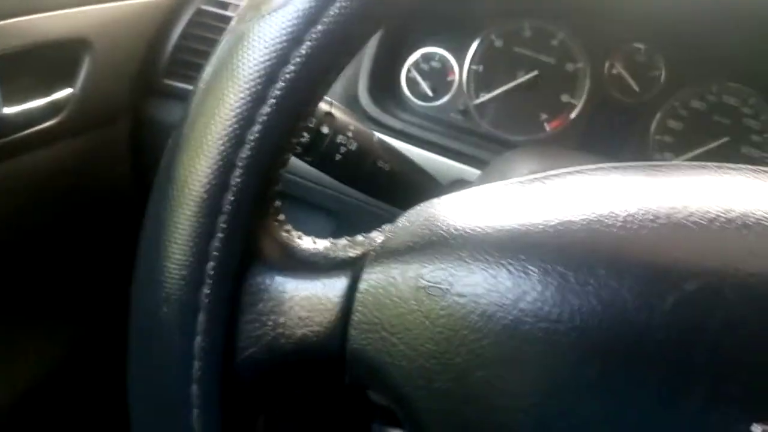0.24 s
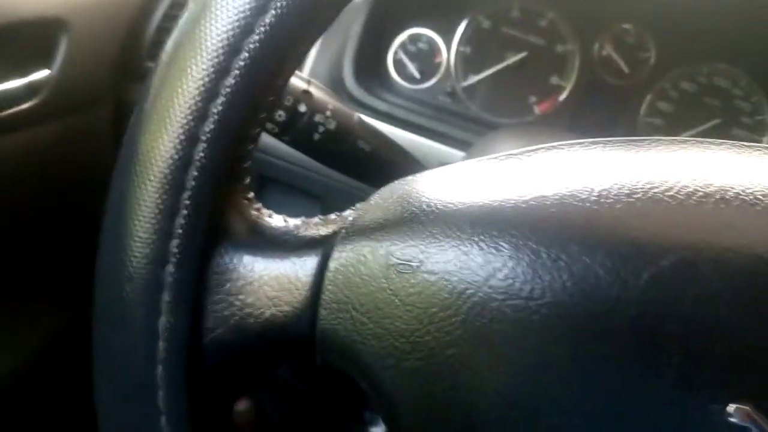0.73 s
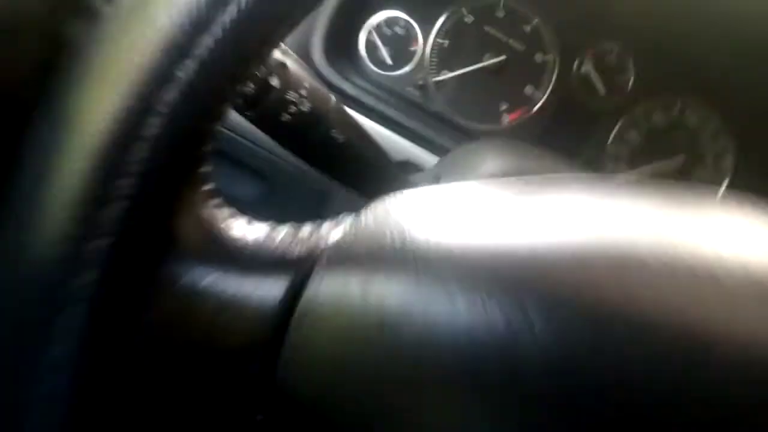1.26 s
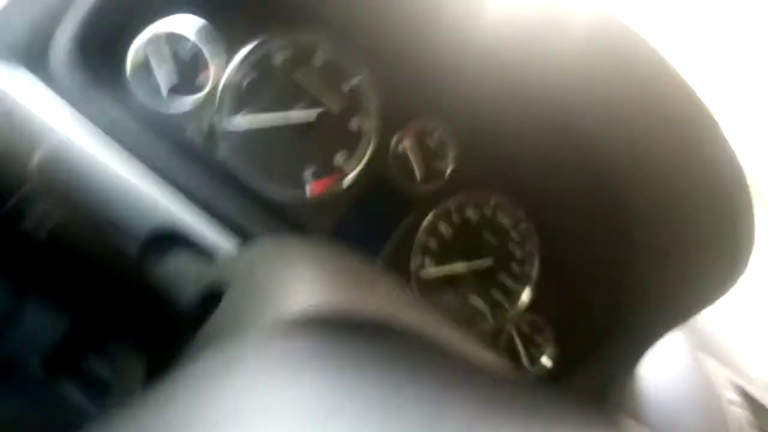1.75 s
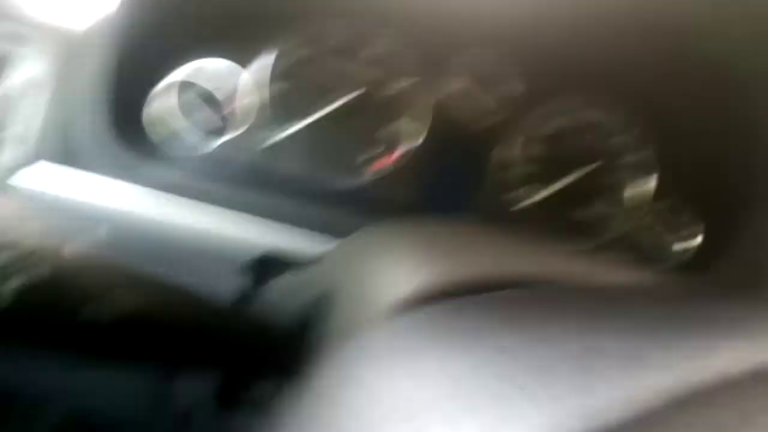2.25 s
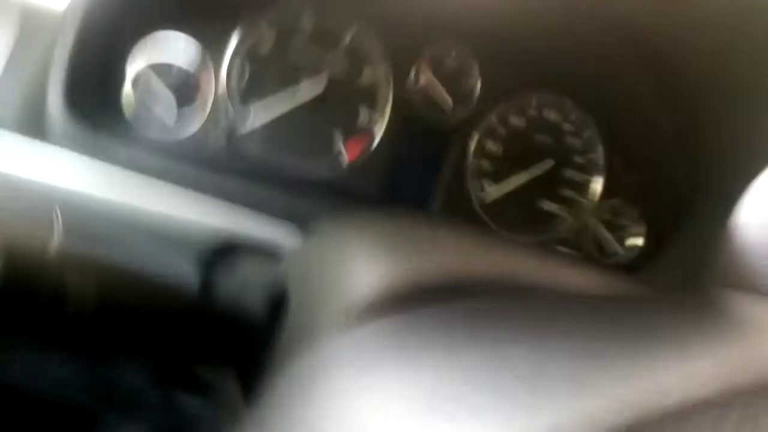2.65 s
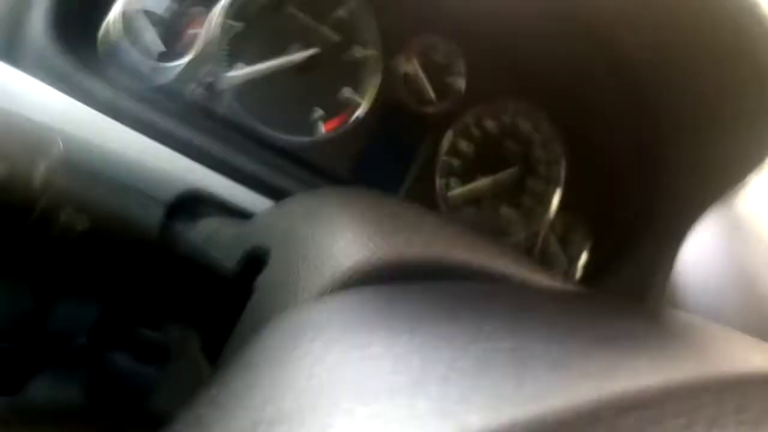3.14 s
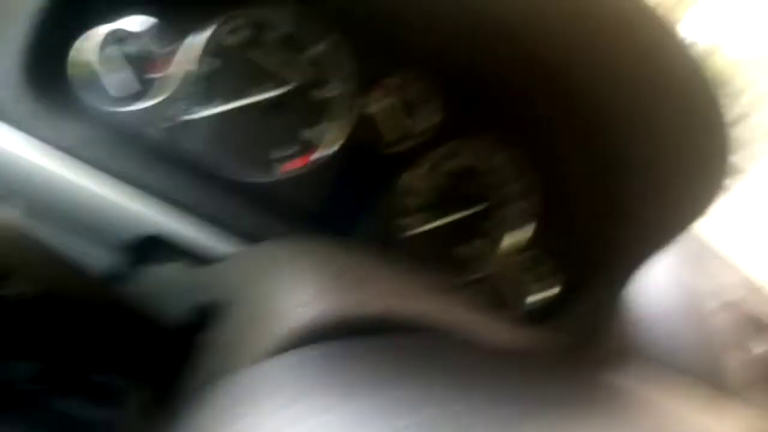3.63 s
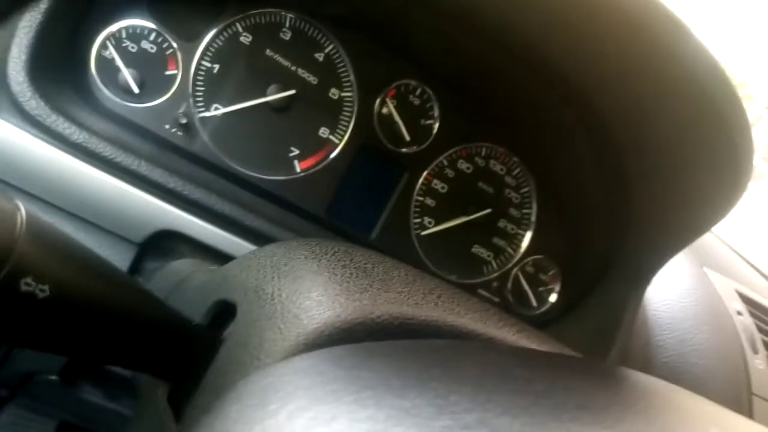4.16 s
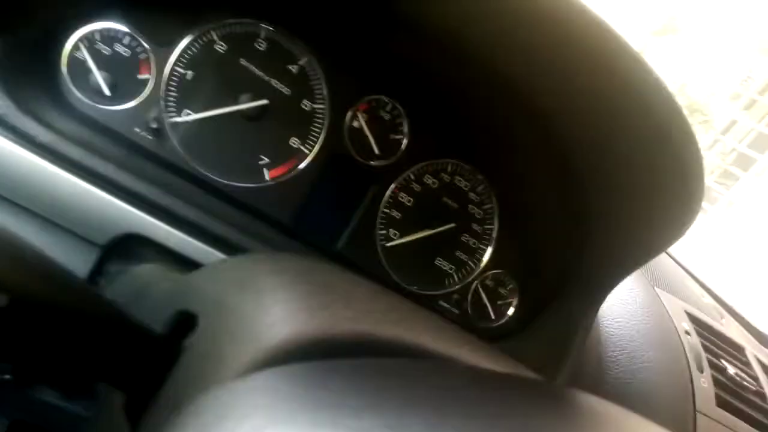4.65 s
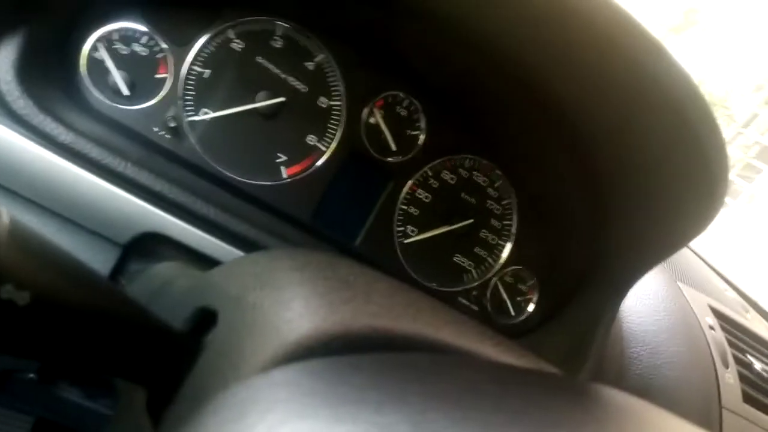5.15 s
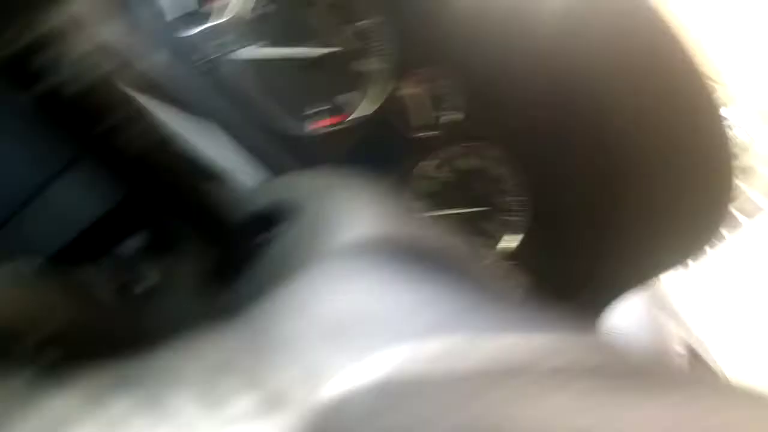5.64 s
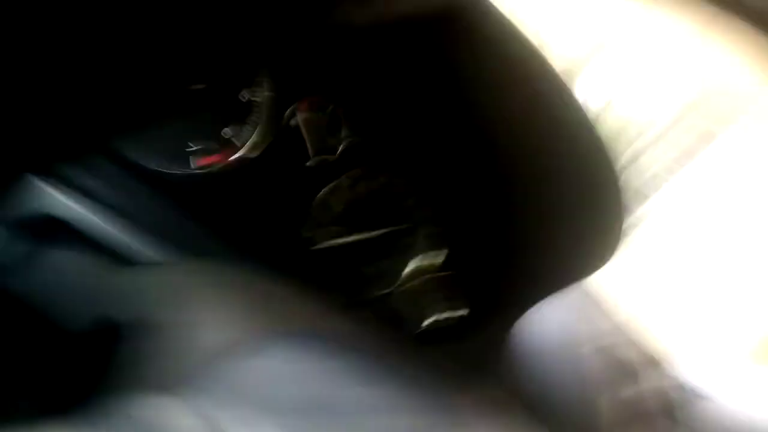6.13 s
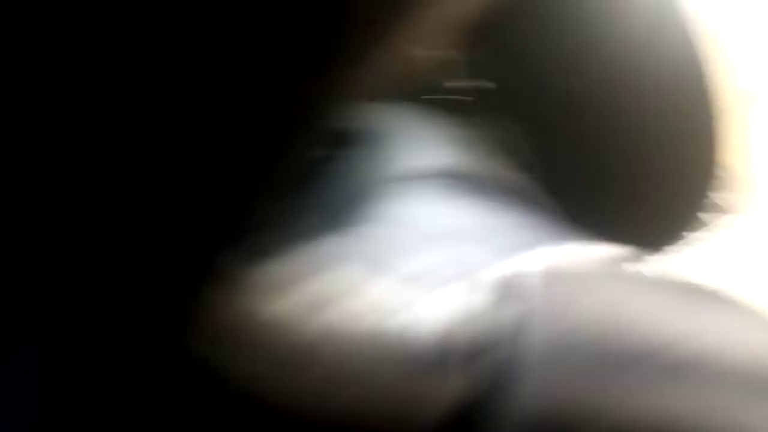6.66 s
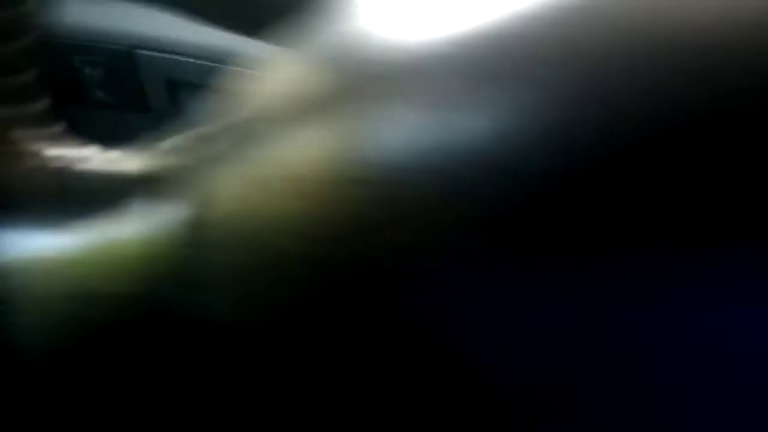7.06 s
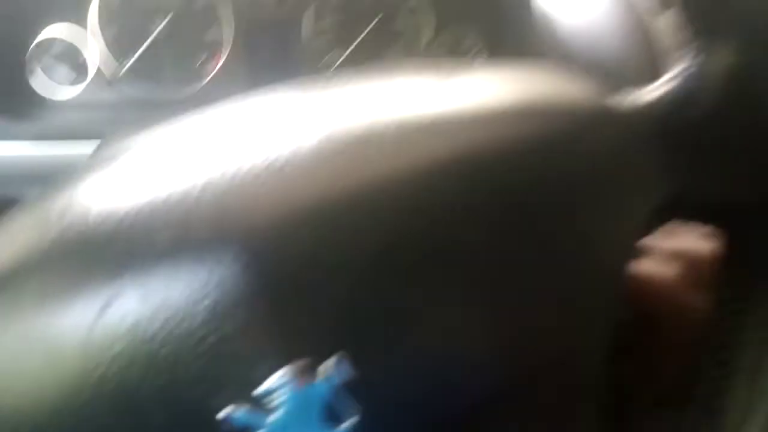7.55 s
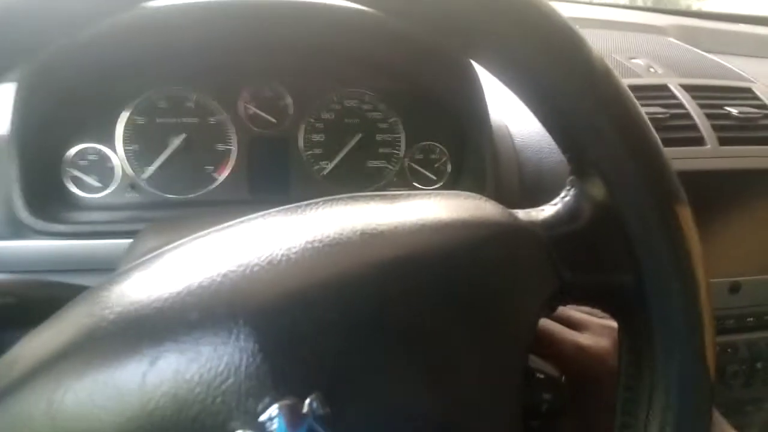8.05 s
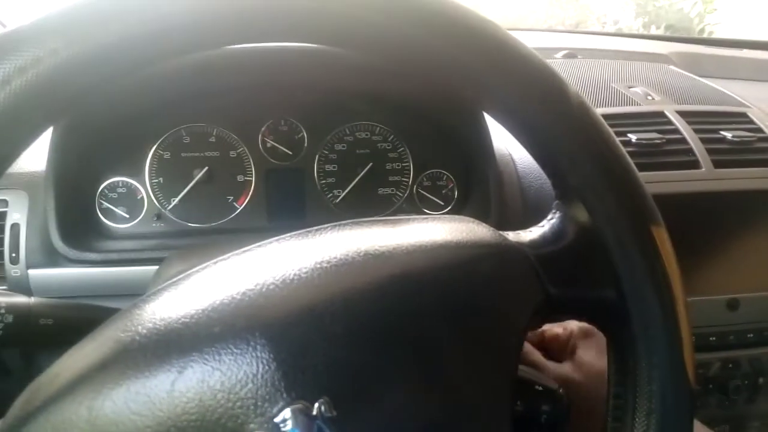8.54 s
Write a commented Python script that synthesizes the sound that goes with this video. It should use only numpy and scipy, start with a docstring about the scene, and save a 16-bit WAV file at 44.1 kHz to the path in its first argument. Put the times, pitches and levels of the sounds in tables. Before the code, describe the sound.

A hand works a key and wrenches a locked steering wheel in a small, dry, padded cabin. Quiet ticks and sleeve rubbing lead to rapid rattling clacks with booming column thuds and dull plastic taps. Smaller clicks follow, then another heavy knock with creaking trim, a still pause, and crisp metallic clicks with a very faint ring. Low handling rumble and light microphone hiss sit underneath.

```python
"""A metallic clack opens over faint hiss and low rumble, in a parked car where a hand works a key in the
ignition lock and jerks the steering wheel against its lock. Metal and plastic clacks are noise bursts
through the lock's modes; thuds, taps and ringing metal are decaying sines, with panel noise under the thuds.
Sleeve and hand rustle and creak as mottled noise, over rumble and cabin boom; the microphone adds hiss."""
import sys
import numpy as np
from scipy import signal
from scipy.fft import rfft, irfft, next_fast_len
from scipy.io import wavfile
from scipy.ndimage import uniform_filter1d, map_coordinates

SR = 44100
rng = np.random.default_rng(int(sys.argv[2]) if len(sys.argv) > 2 else 0)


def master_out(mix):
    """Clip the mix to full scale and print it as 16-bit PCM to the path in sys.argv[1]."""
    frames = np.transpose(np.atleast_2d(mix))
    ceiling = np.clip(frames, -1, 1)
    pcm = np.round(ceiling * 32767).astype(np.int16)
    wavfile.write(sys.argv[1], SR, pcm)


N = 387638

# The body on the seat. Each row: time in seconds, rumble level in dB, boom level in dB.
SHIFTING = [(0.0, -68, -60.5), (0.81, -74, -67.5), (1.35, -60, -53), (1.93, -66, -70), (2.1, -47.5, -51),
            (2.37, -37, -47), (2.69, -52, -59), (3.06, -47, -43.5), (3.21, -49.5, -58.5),
            (3.42, -50.5, -47.5), (3.7, -68.5, -74.5), (5.75, -66, -73), (5.97, -48, -47.5),
            (6.17, -51.5, -60.5), (6.44, -51, -50.5), (6.93, -66.5, -69), (7.83, -70.5, -75.5),
            (8.79, -64.5, -67.5)]
# Strokes of hand and sleeve over wheel and trim.
# Each row: start in seconds, length in seconds, rustle level in dB, creak level in dB.
STROKES = [(0.415, 0.11, -77.5, -79), (0.911, 0.25, -61.5, -67.5), (1.2, 0.28, -59, -72.5),
           (1.485, 0.16, -71, -82), (1.616, 0.14, -58.5, -80), (1.81, 0.18, -59.5, -76),
           (2.033, 0.25, -63, -77), (2.273, 0.071, -72, -76), (2.403, 0.21, -68, -72.5),
           (3.016, 0.062, -73, -62), (3.148, 0.1, -66.5, -57.5), (3.302, 0.22, -65.5, -70),
           (3.717, 0.21, -73, -84.5), (4.078, 0.13, -83, -72.5), (4.491, 0.12, -77, -92),
           (5.234, 0.34, -76, -94), (5.726, 0.29, -66, -76), (5.961, 0.31, -67, -63),
           (6.176, 0.064, -65, -70), (6.301, 0.11, -61, -60), (6.435, 0.12, -64.5, -65),
           (6.661, 0.15, -92, -79), (6.878, 0.068, -81.5, -80), (7.154, 0.2, -89.5, -79),
           (7.86, 0.072, -84, -77.5), (8.074, 0.29, -65.5, -71), (8.488, 0.18, -85, -74)]
# Clacks of key, lock and trim. Each row: start in seconds, relative level in dB, strongest ring in Hz,
# relative low-body level in dB, relative edge (top treble) level in dB, decay t60 in seconds.
CLACKS = [(0.0074, -26.5, 3060, -2.5, -64, 0.066), (0.6275, -39, 4900, -9, -47.5, 0.066),
          (0.648, -45.5, 2920, -7, -48, 0.056), (0.928, -41.5, 2860, -17, -50, 0.11),
          (0.9502, -37, 4800, -6.5, -51.5, 0.065), (1.0091, -39, 4730, -17, -46, 0.13),
          (1.1957, -23, 5540, -9, -28, 0.084), (1.2371, -31, 4160, -8, -48.5, 0.15),
          (1.2511, -27.5, 4070, -18, -54.5, 0.137), (1.3508, -37, 5460, -9.5, -32, 0.1),
          (1.39, -38, 5050, -12.5, -53, 0.06), (1.6591, -41, 3200, -0.5, -43, 0.17),
          (1.917, -35.5, 4850, -7, -50.5, 0.11), (1.942, -37, 4800, 2, -51, 0.12),
          (1.9859, -9, 5150, -4.5, -34, 0.092), (2.0092, -29.5, 5000, 12, -36.5, 0.05),
          (2.0462, -28.5, 4200, -17, -43.5, 0.049), (2.1141, -30, 2950, -2.5, -51, 0.048),
          (2.1725, -23, 4410, 4, -40.5, 0.089), (2.2413, -28.5, 5600, -14, -41, 0.042),
          (2.318, -42, 4500, 10, -47, 0.09), (2.3526, -7, 4950, -4, -35.5, 0.1),
          (2.3994, -31.5, 1860, 0, -45, 0.035), (2.446, -43, 4240, -27, -48, 0.05),
          (2.4897, -31, 3100, -1.5, -47, 0.075), (2.5272, -21.5, 2880, 6, -30, 0.12),
          (2.5587, -27, 1710, -36, -40, 0.12), (2.6095, -31, 4400, -29.5, -37, 0.067),
          (2.7556, -30, 5026, 1, -38, 0.11), (2.7955, -8.5, 4820, -6, -34.5, 0.058),
          (2.8194, -23, 4940, 1.5, -37.5, 0.092), (2.8594, -37.5, 1830, -37, -47.5, 0.07),
          (2.9387, -37.5, 2530, -8, -41.5, 0.12), (2.9876, -14.5, 3670, 2, -40.5, 0.11),
          (3.0106, -20, 3190, -3.5, -33.5, 0.11), (3.0472, -32.5, 4670, -16, -33.5, 0.17),
          (3.068, -28.5, 5000, -7, -33.5, 0.14), (3.095, -33, 4800, -10, -35.5, 0.066),
          (3.2555, -10, 4700, -6.5, -33, 0.083), (3.3268, -30, 6330, -8, -43.5, 0.056),
          (3.358, -37.5, 4420, 6, -46, 0.061), (3.4156, -19.5, 3700, 0, -36.5, 0.067),
          (3.4444, -37.5, 3546, -20, -30.5, 0.19), (3.489, -36.5, 5180, 3, -45, 0.146),
          (3.756, -54, 2100, -27, -48, 0.11), (3.7948, -37.5, 4740, -30.5, -28.5, 0.065),
          (3.8432, -39.5, 4380, -20, -42, 0.095), (3.8751, -39, 4900, -15, -48, 0.077),
          (3.9165, -29, 2930, 0.5, -39.5, 0.066), (4.1006, -49, 4760, 4, -35, 0.099),
          (4.1285, -41, 2930, -3.5, -40, 0.059), (4.195, -58, 3880, -9, -48, 0.078),
          (4.265, -53, 2940, 0.5, -47.5, 0.18), (4.4912, -43, 5570, -33, -22.5, 0.12),
          (4.5386, -57.5, 5340, -16, -6, 0.062), (4.5511, -50, 1920, -4, -36, 0.12),
          (4.5855, -43.5, 3900, -11, -40.5, 0.36), (4.6089, -35.5, 2880, -4, -40.5, 0.15),
          (4.6558, -22, 5790, -10.5, -29.5, 0.063), (4.748, -57.5, 4930, -21, -40, 0.14),
          (4.8344, -35.5, 4600, -17, -47, 0.095), (4.9197, -21, 4620, -12, -43.5, 0.086),
          (4.9444, -28.5, 4660, -24, -30.5, 0.092), (4.968, -30.5, 4900, -3.5, -29.5, 0.076),
          (4.981, -31, 2960, -9, -36.5, 0.061), (5.3657, -41, 4540, -6.5, -45.5, 0.11),
          (5.436, -53, 4160, -33, -32.5, 0.077), (5.6521, -34, 5080, -21.5, -32.5, 0.071),
          (5.754, -37.5, 5070, -45, -37.5, 0.14), (5.7867, -39, 5500, -33, -35.5, 0.061),
          (5.823, -29.5, 5100, -17, -43.5, 0.061), (5.8391, -33.5, 4500, -1, -43, 0.16),
          (5.874, -44, 5200, -12, -44, 0.056), (5.9364, -6.5, 4570, -8, -31.5, 0.063),
          (6.1275, -39, 4650, -6, -43, 0.095), (6.1848, -23, 5360, -58, -26, 0.021),
          (6.1964, -32.5, 4650, -19, -27, 0.035), (6.219, -46, 3670, -3, -37, 0.17),
          (6.4652, -26.5, 4080, -11, -47, 0.07), (6.5201, -51, 4570, -9, -23.5, 0.12),
          (6.536, -40.5, 5490, -13, -38, 0.07), (6.738, -63.5, 1550, -6, -55, 0.11),
          (8.108, -29, 3090, -3.5, -49, 0.15), (8.1594, -18.5, 6000, -15, -24.5, 0.066),
          (8.186, -36.5, 5360, -12, -33.5, 0.14), (8.265, -41, 5800, -14, -42, 0.09),
          (8.307, -28, 6100, -8, -43, 0.072), (8.3195, -26.5, 4600, -9, -41.5, 0.098),
          (8.402, -50, 4350, -30, -48.5, 0.1), (8.4896, -26.5, 6280, -8.5, -24, 0.12),
          (8.5356, -42.5, 2870, -5.5, -32, 0.066), (8.6906, -31.5, 5670, -5.5, -27.5, 0.07)]
# Weak scrapes as the play is taken up before a clack. Each row: start in seconds, relative level in dB.
LEAD_INS = [(2.164, -27.5), (2.345, -20.5), (2.52, -19.5), (2.748, -33), (2.981, -19.5), (3.243, -22.5),
            (3.405, -30), (3.907, -48), (4.646, -33.5), (4.904, -39), (5.925, -25.5), (8.102, -38)]
# Thuds through column and dash. Each row: start in seconds, column level in dB, column ring in Hz,
# panel level in dB relative to the column.
THUDS = [(0.07, -48.5, 118, -21.5), (0.469, -48.5, 137.5, -24), (0.691, -43, 124, -31),
         (0.952, -42, 177.5, -18), (1.208, -42.5, 141, -15), (1.351, -41.5, 102, -34),
         (1.424, -47.5, 119, -20), (1.656, -37, 103, -16), (1.976, -26.5, 179, -13),
         (1.982, -26, 95.3, -3.5), (2.18, -26.5, 184.3, -11), (2.233, -47, 170, -4), (2.364, -16, 153, -13),
         (2.396, -29.5, 117.3, -16), (2.536, -29.5, 200.7, -15), (2.549, -22.5, 110.5, -14.5),
         (2.722, -41, 113, -26), (2.81, -22.5, 139, -12.5), (2.852, -46, 99, -24), (2.995, -30.5, 191, -4),
         (3.001, -20, 132.4, -13), (3.245, -39, 182, 6.5), (3.269, -29, 163.4, -10),
         (3.425, -30, 123.7, -16.5), (3.492, -32, 116.7, -18.5), (3.892, -39.5, 138.3, -20),
         (4.135, -48.5, 174, -22), (4.268, -48, 139.6, -31), (4.541, -44, 125.5, -42),
         (4.66, -41, 139, -32), (4.92, -43, 175, -17), (4.944, -35.5, 175.2, -25),
         (5.375, -41.5, 118.4, -35), (5.889, -28, 149, -11.5), (5.935, -25, 100, -4.5),
         (5.952, -29, 122, -21), (6.062, -47, 113, -17), (6.165, -33, 122.7, -40), (6.278, -53, 93.4, -5),
         (6.403, -33, 265.4, -0.5), (6.413, -24.5, 104.4, -12), (6.517, -37.5, 126.6, -27),
         (6.654, -52, 113.5, -24.5), (8.119, -44, 136, -28), (8.173, -38.5, 127.6, -36),
         (8.348, -44.5, 125.5, -14), (8.583, -32.5, 131.2, -11), (8.622, -36.5, 168, -7.5),
         (8.707, -43.5, 72, -8)]
# Dull taps on plastic. Each row: start in seconds, relative level in dB, ring in Hz, decay t60 in seconds.
TAPS = [(1.419, -35.5, 757, 0.03), (1.964, -35.5, 770, 0.073), (2.173, -24, 716, 0.024),
        (2.231, -34.5, 597, 0.051), (2.312, -37, 770, 0.019), (2.367, -13.5, 604, 0.03),
        (2.553, -23, 496, 0.029), (2.818, -28.5, 430, 0.1), (2.939, -39.5, 1090, 0.029),
        (3.016, -16.5, 572, 0.029), (3.437, -32, 470, 0.018), (3.464, -33.5, 760, 0.024),
        (3.487, -35, 750, 0.032), (3.514, -39, 795, 0.023), (3.544, -39, 796, 0.027),
        (4.125, -44.5, 1150, 0.029), (5.825, -27, 650, 0.029), (6.024, -34.5, 945, 0.017),
        (6.063, -29.5, 940, 0.015), (6.127, -39, 1020, 0.046), (6.153, -37, 896, 0.016),
        (6.174, -25, 840, 0.0045), (6.406, -31.5, 737, 0.046), (6.74, -60.5, 603, 0.2),
        (8.245, -45.5, 513, 0.08), (8.495, -34, 1112, 0.048), (8.691, -41, 1565, 0.082)]
# Modes of a loose metal part. Each row: frequency in Hz, decay t60 in seconds.
RING_MODES = [(1340, 1.2), (3912, 1.2)]
# Blows on that part. Each row: start in seconds, level of the first mode in dB, level of the second in dB.
RING_BLOWS = [(8.492, -76, -70), (8.692, -59, -73)]
# Modes of lock and trim. Each row: frequency in Hz, strength in dB.
LOCK_MODES = [(570, -7.5), (750, -3.5), (900, -4), (1110, -4.5), (1420, -9), (2060, -3.5), (2350, -10),
              (2930, -2), (3430, -5.5), (3650, -1.5), (4100, 1), (4370, -4.5), (4880, -3), (5250, 2),
              (5650, 1.5), (6100, -3)]

# Noise colours. Each row: frequency in Hz, relative density in dB per Hz.
RUSTLE_COLOUR = [(500, -28), (1200, -7.5), (1900, -3), (3350, -2.5), (4750, 1.5), (6500, -9), (8000, -35.5),
                 (13000, -100)]
RUMBLE_COLOUR = [(50, -35), (85, -0.5), (119, 2), (188, -4), (247, -20), (300, -16.5), (390, -56.5),
                 (660, -120)]
CREAK_COLOUR = [(180, -34.5), (300, -7), (600, -2), (1200, -7.5), (2500, -20.5), (6000, -100)]
# lowest cabin mode
BOOM_COLOUR = [(22, -37.5), (40, -12), (62, 8.5), (80, -2), (250, -110)]
CLACK_COLOUR = [(180, -21), (300, -10.5), (595, -9), (1120, -4.5), (1240, -8), (1440, -3), (2340, -4.5),
                (2730, -1.5), (3120, -8), (4970, -5), (6720, -11), (7940, -30)]
# brightest part of a clack
EDGE_COLOUR = [(7000, -72.5), (8500, -39.5), (11000, -43.5), (13300, -46.5), (15000, -33), (16300, -41)]
# dash panel under a thud
PANEL_COLOUR = [(200, -27), (270, 1), (450, -1), (650, -18.5), (2500, -120)]
HISS_COLOUR = [(120, -32.5), (200, 0), (323, -2.5), (374, -4), (857, -13), (1890, -12.5), (4930, -20),
               (6260, -19.5), (8560, -30.5), (13600, -29), (15100, -21.5), (16300, -34)]

# The low body is weak in a clack's first blow and grows in the rattle.
# Each row: frequency in Hz, relative gain in dB.
BODY_LAG = [(1600, -6), (2600, -1.5)]
# Part of a clack that misses the modes, so light contacts ring clearer than hard ones.
# One row: light contact in dB, its share as a gain, hard contact in dB, its share as a gain.
PLAIN_SHARE = [-45, .3, -20, 1.1]

SPAN = SR // 2  # samples in half a second
REST_RUSTLE_DB, REST_CREAK_DB = -85, -84.5  # between strokes
STROKE_ATTACK_S, STROKE_T60 = 0.07, 0.17  # seconds
GRIT_PER_S, GRIT_DB, GRIT_SPREAD_DB, GRIT_T60 = 140, -6, 1.5, 0.015  # ticks riding on the rustle; t60 in s
SING_DB, SING_WIDTH_HZ, SING_WANDER_DB = 3, 60, 5.5  # trim modes under rubbing
SHUDDER_DB, SHUDDER_T60, SHUDDER_RISE_S = -5.5, 0.23, 0.014  # rumble after a thud; t60 in s
FOCUS_DB, FOCUS_WIDTH = 5, .5  # lift around a clack's ring, and its width in log frequency
HALF_WIDTH_HZ = 45  # of each lock mode
STRIKE_S = .0004  # shortest possible rise of a clack, in seconds
CHATTER_DB, HILLS_DB = 1.5, 3.5  # stutter of a tail, random colour of each contact
HANDOVER = .12  # share of t60 after which neighbouring parts take over the rattle
STRIKE_FOCUS = 1.4  # focus factor of the first blow
SAG, SAG_S = 0.32, .012  # a thud starts this share sharp and settles with this time constant in seconds
COLUMN_T60, COLUMN_RISE_S = 0.2, 0.015  # seconds
HISS_DB, TOP_HZ = -76, 16000


def amp(db):
    """Gain of a level in dB."""
    return 10 ** (np.asarray(db) / 20)


def unit(x):
    """Signal scaled to rms 1."""
    return x / np.sqrt(np.mean(x ** 2) + 1e-20)


def along(points, hz):
    """Curve through (Hz, value) points on a log frequency axis."""
    f, v = np.transpose(points)
    return np.interp(np.log(hz + 1), np.log(f + 1), v)


def filtered(x, gain):
    """Signal shaped by a gain over frequency."""
    m = next_fast_len(len(x) + 4096)
    return irfft(rfft(x, m) * gain(np.fft.rfftfreq(m, 1 / SR)), m)[:len(x)]


def coloured(x, colour):
    """Signal given a colour in dB over frequency, at rms 1."""
    return unit(filtered(x, lambda f: amp(along(colour, f))))


def wobble(rate, size=N):
    """Smooth random curve with this many knots a second."""
    knots = rng.standard_normal(int(size * rate / SR) + 4)
    return map_coordinates(knots, [np.arange(size) * rate / SR])


def add(track, s, sound):
    """Mixes a sound into the track at s seconds."""
    track[max(round(s * SR), 0):][:len(sound)] += sound


def damped(hz, t60, rise, sag=0):
    """One decaying mode with a soft start; its pitch may start sharp and sag."""
    t = np.arange(SPAN) / SR
    bent_time = t + sag * SAG_S * (1 - np.exp(-t / SAG_S))
    return np.sin(2 * np.pi * hz * bent_time) * amp(-60 * t / t60) * (1 - np.exp(-t / rise))


def mottled(colour, patchy_db, lumps_db):
    """Coloured noise of rms 1 with patches of random gain in time and frequency."""
    z = signal.stft(rng.standard_normal(N + 512), nperseg=512)[2]
    field = uniform_filter1d(rng.standard_normal(z.shape), size=3, axis=0)
    field = uniform_filter1d(field, size=7, axis=1)
    noise = signal.istft(z * amp(patchy_db * unit(field)), nperseg=512)[1][:N]
    return coloured(noise * amp(lumps_db), colour)


def movement():
    """The body shifts: rubbing, plus seat and dash rumble and a cabin boom, each as uneven noise."""
    seconds, rumble_db, boom_db = np.transpose(SHIFTING)
    now = np.arange(N) / SR
    rumble_gain = amp(np.interp(now, seconds, rumble_db)) + shudder()
    boom_gain = amp(np.interp(now, seconds, boom_db))
    rumble = mottled(RUMBLE_COLOUR, patchy_db=4.0, lumps_db=0.41 * wobble(5.2))
    boom = mottled(BOOM_COLOUR, patchy_db=.8, lumps_db=3 * wobble(7))
    return rubbing() + rumble_gain * rumble + boom_gain * boom


def shudder():
    """Gain of the dash rumble that every thud sets off and that then dies away."""
    out, t = np.zeros(N + SR), np.arange(SPAN) / SR
    for s, db, *_ in THUDS:
        add(out, s, amp(db + SHUDDER_DB - 60 * t / SHUDDER_T60) * (1 - np.exp(-t / SHUDDER_RISE_S)))
    return out[:N]


def rubbing():
    """Cloth rubs in mottled grains with gritty catches, and the trim creaks in lumps."""
    rustle_gain, creak_gain = strokes()
    rustle = mottled(RUSTLE_COLOUR, patchy_db=3, lumps_db=1.2 * wobble(15) + 1.5 * wobble(200))
    creak = mottled(CREAK_COLOUR, patchy_db=3, lumps_db=3 * wobble(60) + 2 * wobble(12))
    gritty = rustle + amp(GRIT_DB) * grit()
    return rustle_gain * through_trim(gritty) + creak_gain * through_trim(creak)


def strokes():
    """Gains of rustle and creak: every stroke rises, holds and dies away."""
    gains = amp([[REST_RUSTLE_DB], [REST_CREAK_DB]]) * np.ones(N + SR)
    t = np.arange(SR) / SR
    for s, length, *levels in STROKES:
        press = np.minimum(t / STROKE_ATTACK_S, 1) * amp(-60 * np.maximum(t - length, 0) / STROKE_T60)
        for gain, db in zip(gains, levels):
            add(gain, s, amp(db) * press)
    return gains[:, :N]


def grit():
    """Sparse short noise ticks of uneven size where hand and sleeve catch."""
    catches = (rng.random(N) < GRIT_PER_S / SR) * amp(GRIT_SPREAD_DB * rng.exponential(size=N))
    envelope = signal.lfilter([1], [1, -amp(-60 / (SR * GRIT_T60))], catches)
    return coloured(envelope * rng.standard_normal(N), RUSTLE_COLOUR)


def through_trim(x):
    """Rubbing makes the lock and trim modes sing faintly, now one, now another."""
    f, t, z = signal.stft(x, SR, nperseg=1024)
    gain = 1
    for hz, db in LOCK_MODES:
        wander_db = SING_WANDER_DB * wobble(12 * 512, size=len(t))  # twelve knots a second, frames 512 apart
        gain = gain + amp(SING_DB + db + wander_db) / (1 + ((f[:, None] - hz) / SING_WIDTH_HZ) ** 2)
    return unit(signal.istft(z * gain, SR, nperseg=1024)[1][:N])


def clacks():
    """A focused first blow, then a rattle handed from part to part that re-excites the lock's modes."""
    out = np.zeros(N + SR)
    lead = 220  # samples of silence ahead of each burst, taken off again when mixing
    t = np.arange(SPAN // 2) / SR
    m = next_fast_len(len(t) + 2048)
    f = np.fft.rfftfreq(m, 1 / SR)
    mode_hz, mode_db = np.transpose(LOCK_MODES)
    modes = 1 / (1 + 1j * (f - mode_hz[:, None]) / HALF_WIDTH_HZ)
    band = (f > 2000) & (f < 7000)  # each stage is levelled by its gain in this range
    scrapes = [(s, db, 4800, -8, -50, .09) for s, db in LEAD_INS]
    for s, db, ring_hz, body_db, edge_db, t60 in list(CLACKS) + scrapes:
        rise = STRIKE_S + .06 * t60 ** 2  # long scrapes start softer than short clicks
        direct = amp(-60 * t / max(t60, .02)) * (1 - np.exp(-t / rise))
        shape = direct + amp(-34.5 - 60 * t / 0.24)  # over a faint slower tail

        stage = t / (HANDOVER * t60)
        first, second, third = 1 - stage, 1 - abs(stage - 1), stage - 1
        shares = np.sqrt(np.clip([first, second, third], 0, 1))

        # small parts sound in a limited range
        focus = FOCUS_DB * np.exp(-(np.log((f + 1) / ring_hz) / FOCUS_WIDTH) ** 2)
        body_tilt = along([(1100, body_db + 8), (2600, 0.0031)], f)
        colour = amp(along(CLACK_COLOUR, f) + body_tilt + focus) * (f < 8500)
        edge = amp(along(EDGE_COLOUR, f) + edge_db + 48)
        own_ring = 2 / (1 + 1j * (f - ring_hz) / (2 * HALF_WIDTH_HZ))
        plain = np.interp(db, PLAIN_SHARE[::2], PLAIN_SHARE[1::2])
        ringing = min(t60 / .05, 1) ** 2  # the briefest ticks hardly ring

        spectrum = 0
        for share, lift in zip(shares, (STRIKE_FOCUS, 1, .5)):
            # lumps of a few milliseconds, under a slower chatter
            lumps_db = 2.2 * wobble(400, size=len(t)) + CHATTER_DB * wobble(120, size=len(t))
            noise = rng.standard_normal(len(t)) * amp(lumps_db)
            # every stage keeps the energy of its envelope
            noise = noise * np.linalg.norm(share * shape) / np.linalg.norm(noise * share * shape)

            strengths = amp(mode_db + 5.5 * rng.standard_normal(len(LOCK_MODES)))
            rings = plain + ringing * (strengths @ modes + lift * own_ring)
            hills = np.transpose([np.linspace(800, 7000, 9), HILLS_DB * rng.standard_normal(9)])
            stage_db = along(hills, f) + (lift - 1) * (focus + along(BODY_LAG, f))
            body = colour * amp(stage_db) * rings

            thick = rfft(np.pad(noise * share * shape, (lead, 0)), m) * body
            # the highest treble is soaked up faster by the upholstery
            thin = rfft(np.pad(noise * share * direct ** 1.3, (lead, 0)), m) * edge
            spectrum = spectrum + (thick + thin) / np.sqrt(np.mean(abs(body[band]) ** 2))
        add(out, s - lead / SR, amp(db - 4.0) * irfft(spectrum, m)[:len(t)])
    return out[:N]


def thuds():
    """The column rings low, its main mode sagging in pitch, and shakes the dash panel as a noise burst."""
    out, t = np.zeros(N + SR), np.arange(SPAN) / SR
    for s, db, hz, panel_db in THUDS:
        column = damped(hz, COLUMN_T60, COLUMN_RISE_S, SAG)
        column += .3 * damped(hz * rng.uniform(.65, 1.6), COLUMN_T60, COLUMN_RISE_S)
        shake = coloured(rng.standard_normal(SPAN), PANEL_COLOUR)
        panel = amp(db + panel_db - 60 * t / 0.15) * (1 - np.exp(-t / 0.0068)) * shake
        add(out, s, amp(db) * column + panel)
    return out[:N]


def taps():
    """Plastic trim rings briefly: a main mode with a weaker one below and one above."""
    out, rise = np.zeros(N + SR), .0015  # seconds
    for s, db, hz, t60 in TAPS:
        below = damped(hz * rng.uniform(0.71, 1.0), t60, rise)
        above = damped(hz * rng.uniform(1.0, 1.2), t60, rise)
        add(out, s, amp(db - 1.0) * (damped(hz, t60, rise) + .5 * (below + above)))
    return out[:N]


def ringing_metal():
    """A loose metal part rings on after a blow as two slowly decaying modes."""
    out = np.zeros(N + SR)
    for s, *levels in RING_BLOWS:
        for db, (hz, t60) in zip(levels, RING_MODES):
            add(out, s, amp(db) * damped(hz, t60, 0.0014))
    return out[:N]


def scene():
    """Everything in the cabin."""
    return (movement() + clacks() + thuds() + taps() + ringing_metal())[None]


def record(dry):
    """The microphone adds steady coloured hiss and keeps nothing above its band limit."""
    hiss = amp(HISS_DB) * coloured(rng.standard_normal(N), HISS_COLOUR)
    return filtered(dry[0] + hiss, lambda f: f < TOP_HZ)[None]


dry = scene()
out = record(dry)
master_out(out)
```